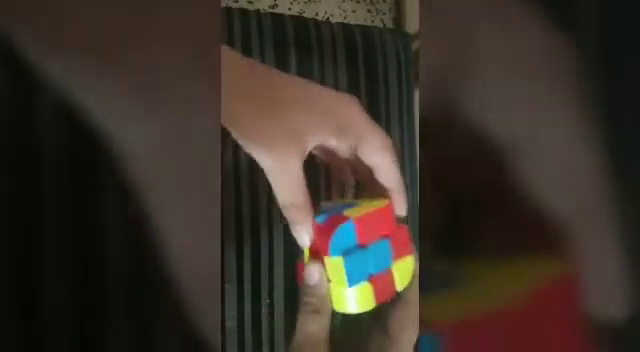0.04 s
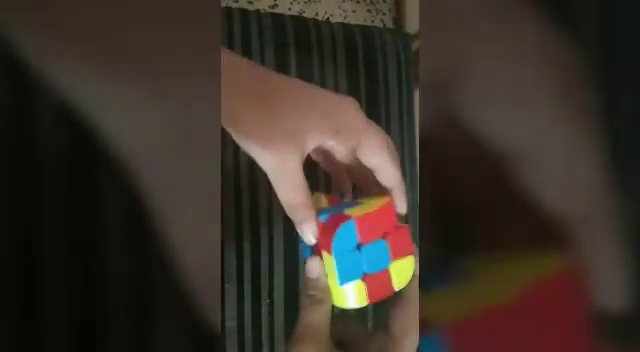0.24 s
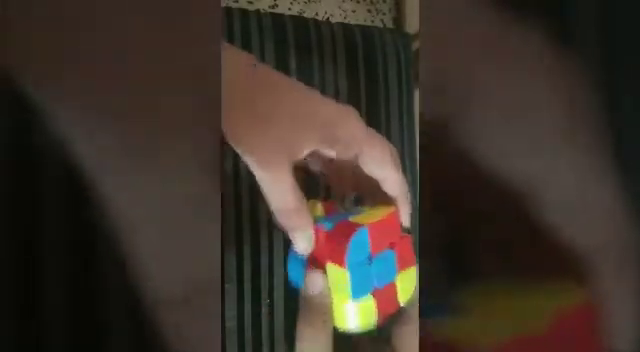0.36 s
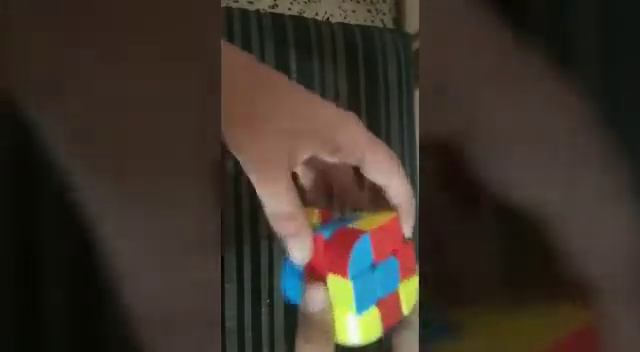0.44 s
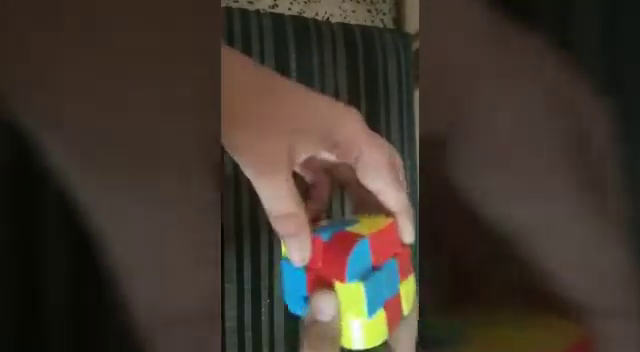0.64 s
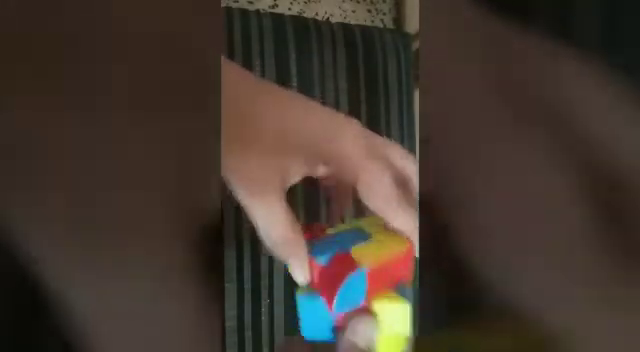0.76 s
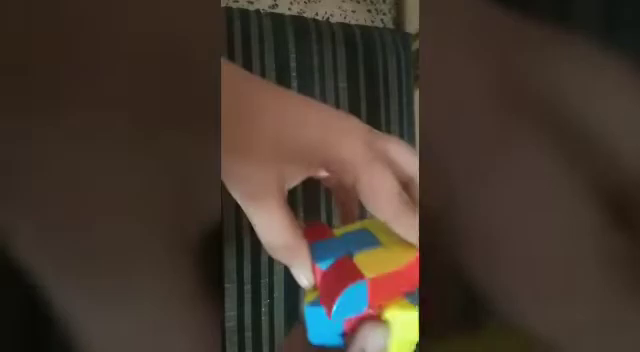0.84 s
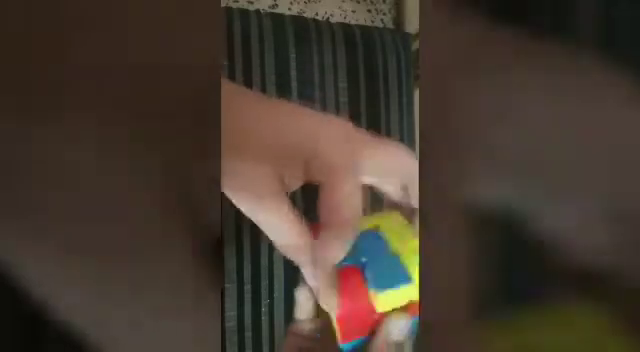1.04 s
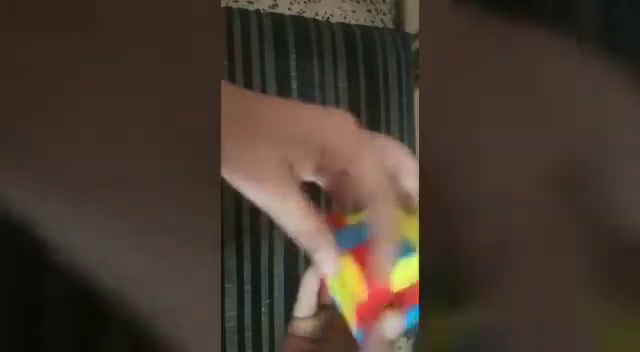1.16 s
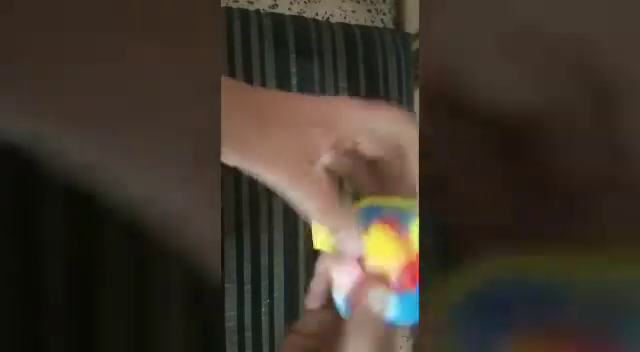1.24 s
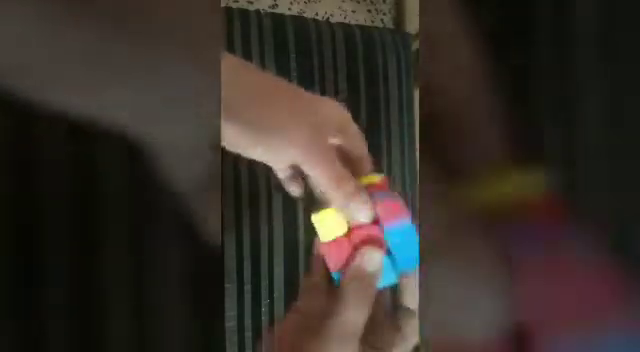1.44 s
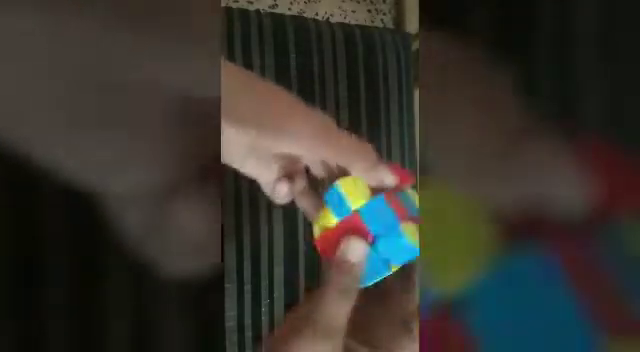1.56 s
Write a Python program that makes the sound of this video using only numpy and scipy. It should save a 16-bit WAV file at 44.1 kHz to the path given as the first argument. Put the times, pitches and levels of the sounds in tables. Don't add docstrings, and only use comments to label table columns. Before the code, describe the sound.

A plastic puzzle cube is twisted by hand, close to a phone microphone in a small soft room. Faint ticks lead to a loud, bright cluster of clacks at 0.2-0.28 s. Sparse light ticks and brief scrapes follow until 1.02 s. A second, slightly softer rattling snap peaks around 1.09 s. Lighter clicks and sliding scrapes run from 1.27 to 1.6 s, with a tiny chirp near 1.39 s. Faint hum underneath.

```python
import sys
import numpy as np
from scipy import signal
from scipy.fft import rfft, irfft, next_fast_len
from scipy.io import wavfile

SR = 44100
rng = np.random.default_rng(int(sys.argv[2]) if len(sys.argv) > 2 else 0)


def wav_record(signal):
    frames = np.transpose(np.atleast_2d(signal))
    bounded = np.clip(frames, -1, 1)
    quanta = np.round(bounded * 32767).astype(np.int16)
    wavfile.write(sys.argv[1], SR, quanta)


def level_to_linear(level):
    exponent = np.asarray(level, float) / 20
    return 10 ** exponent


N = 70560

# t/s, edge level/dB, shell over edge/dB, piece f/Hz
FIRST_TURN = [(0.0257, -35.5, -11, 1300), (0.0268, -46.5, -27, 2000), (0.0642, -45, -7, 3100),
              (0.0939, -42.5, -2, 2400), (0.112, -53, 6, 2000), (0.1233, -39, 4, 2250),
              (0.146, -44, -27, 2240), (0.158, -44, -20, 3450), (0.1725, -35, -37, 1030),
              (0.1893, -33, -14, 2150), (0.1954, -34, -5, 1380), (0.199, -28.5, -6, 1980),
              (0.201, -10.5, -17.5, 1680), (0.2021, -20.5, -7, 4440), (0.204, -18, -16, 3100),
              (0.206, -27, -4, 2200), (0.2151, -22, -14, 1790), (0.2210, -10, -23.5, 4200),
              (0.2215, -15, -2, 1640), (0.2235, -4.5, -13, 2740), (0.224, -15, -10, 3200),
              (0.2267, -30, -28, 4600), (0.235, -17, -24, 3760), (0.2486, -1.5, -18, 3100),
              (0.2500, -10.5, -11, 534), (0.2512, -22, -10, 1700), (0.2518, -13, -18, 4500),
              (0.256, -13, -15, 1580), (.2588, -13.5, -13, 3450), (0.2605, -13.5, -14, 4400),
              (.264, -20, -26, 2180), (0.277, -20.5, -16, 2720), (0.3571, -32.5, -11, 3100),
              (0.377, -39, -5.5, 1280)]
# t/s, edge level/dB, shell over edge/dB, piece f/Hz
REGRIP = [(0.4124, -38.5, -4, 840), (0.416, -32.5, -14.5, 3560), (0.4522, -42, -7.5, 2600),
          (0.4881, -65, -12, 4000), (0.4889, -26.5, -10, 2540), (0.491, -34.5, -8, 1300),
          (0.534, -35, -5, 1460), (0.54, -29, -12, 3050), (0.5698, -41, -15, 1460),
          (0.611, -34.5, -9.5, 940), (0.662, -34, -13.5, 1310), (0.6797, -39.5, 0.5, 3440),
          (0.6868, -33, -5, 3940), (0.689, -28, -12, 2400), (0.6902, -37, -3.5, 2000),
          (0.69, -38, -1, 3270), (0.708, -61.5, 14, 794), (0.7305, -37, -4.5, 3500),
          (0.732, -36, -13, 2450), (0.737, -39, -10, 1850), (0.7724, -39, -6.5, 3770),
          (0.777, -37.5, -13, 2000), (0.79, -36, -6.5, 4850), (0.7974, -35.5, -2.5, 2430),
          (0.8, -30, -24, 4330), (0.802, -34.5, -10.5, 1290), (0.8075, -27.5, -36, 2600),
          (0.8187, -42.5, -7.5, 2060), (0.8481, -41.5, -3.5, 1800), (0.8529, -41, -3.5, 1400),
          (0.901, -38.5, -7.5, 1800), (0.973, -34, -11, 2050), (0.988, -38, -9, 2480),
          (0.993, -39, -1.5, 1420), (1.0232, -32.5, -32, 4800), (1.0275, -36, -8, 2190)]
# t/s, edge level/dB, shell over edge/dB, piece f/Hz
SECOND_TURN = [(1.054, -35, -1.5, 900), (1.0577, -30.5, -10, 2000), (1.061, -33, -15, 2980),
               (1.0685, -28, -12, 1990), (1.073, -27, -4, 4640), (1.0764, -19, -13, 800),
               (1.0784, -17.5, -9, 800), (1.081, -18.5, -9, 815), (1.084, -15, -6, 2630),
               (1.085, -17.5, -8.5, 800), (1.087, -11, -15, 1360), (1.0882, -8.5, -29, 3050),
               (1.0904, -17.5, -16, 2000), (1.0935, -20.5, -8.5, 2470), (1.0968, -19, -9, 3400),
               (1.101, -20, -21, 4650), (1.1013, -15, -8, 3100), (1.1038, -11, -18.5, 2460),
               (1.1048, -17.5, -10, 4770), (1.1058, -16.5, -20, 3770), (1.1115, -31, -17, 3880),
               (1.118, -41, -14, 4600), (1.1807, -33, -12, 2030), (1.2145, -42.5, -3.5, 744)]
# t/s, edge level/dB, shell over edge/dB, piece f/Hz
LIGHT_TURNS = [(1.274, -36, -21, 3030), (1.2777, -33.5, 1, 1900), (1.279, -35.5, -5, 3600),
               (1.283, -33, -11, 4570), (1.293, -24, -7.5, 4640), (1.2951, -24, -22, 4800),
               (1.2987, -26.5, -17, 4400), (1.3033, -32, -3.5, 5000), (1.3055, -35, -3, 5000),
               (1.3103, -40, -15, 4300), (1.3301, -31.5, -26, 4800), (1.337, -45.5, 0, 2040),
               (1.3495, -41, 1.5, 2200), (1.356, -40, -7.5, 2300), (1.3826, -41, -14, 1940),
               (1.3862, -25, -19, 2200), (1.4159, -23.5, -4, 2230), (1.4211, -22.5, -15.5, 1700),
               (1.4349, -29, -12, 2290), (1.456, -30.5, -1, 4600), (1.4578, -36.5, -10, 2600),
               (1.478, -36.5, -2, 3450), (1.4822, -30, -21, 2500), (1.4992, -33.5, -16, 2140),
               (1.5263, -54, 1, 1300), (1.535, -48, -5, 2500), (1.541, -49.5, 4.5, 1380),
               (1.564, -39.5, 1, 2260), (1.571, -34.5, -8.5, 1320), (1.577, -30.5, -4.5, 5030),
               (1.5797, -34.5, -7, 3020), (1.589, -40, -12, 2540), (1.5934, -40, -22, 3780)]
# t/s, level/dB
SLIDE_PRESSURE = [(0, -93), (.17, -64), (.2, -36.5), (.35, -44.5), (.6, -88), (0.678, -39.5), (.76, -92),
                  (.81, -52.5), (.95, -51.5), (1.069, -45), (1.11, -58), (1.238, -49.5), (1.308, -38.5),
                  (1.382, -45), (1.43, -38.5), (1.489, -51), (1.52, -48), (1.579, -38.5)]
# t/s, level/dB
THUMPS = [
    (0.249, -48),
    (.29, -56),
    (0.699, -54.5),
    (0.734, -61.5),
    (0.416, -57.5),
    (1.076, -56.5),
    (1.291, -64),
]
# f/Hz, level/dB
EDGE_TONE = [(1800, -43), (3000, -25.5), (4700, -7), (6300, -1), (7600, 1), (9300, -18.5), (11000, -27.5),
             (15500, -56)]
# f/Hz, width/Hz, level/dB
SHELL_MODES = [(800, 433, -0.5), (1530, 890, 3), (2400, 2090, 1.5), (4196, 830, 2.5), (5000, 910, 3)]
# f/Hz, level/dB
AIR_TONE = [(15, -40), (30, -1.5), (102, 5), (451, 0), (2500, -13.5), (7600, -9), (9600, -34), (15700, -33)]
# f/Hz, t/s
ECHO_DECAY = [(500, 0.23), (2000, 0.19), (7000, 0.18), (10000, 0.24), (11800, 0.059)]

AIR_DB = -62.5
ROOM_DB, ROOM_GAP_S = -9.5, 0.004
CONTACT_LAG_S, CHATTER_S = 0.0007, 0.0035
RUB_S, RUB_DB = 0.0012, -11
REBOUND_LOSS_DB, REBOUND_SCATTER_DB = 30, 8
PUFF_LENGTHS, PUFF_DB = 4.2, -17
SOFT_PUFF_PER_DB = 0.2
SHELL_DB, SHELL_SCATTER_DB = 3, 1.5
SHELL_LOW_HZ, SHELL_TOP_HZ = 605, 7000
PIECE_DB, PIECE_Q = 5, 4
SPARK_HZ, SPARK_DB, SPARK_FROM_DB = 13500, -27, -14
SLIPS_PER_S, SLIP_SPREAD_DB, SLIDE_DB, SLIDE_SHELL_DB = 2500, 2, -7.5, -7.5
THUMP_HZ, THUMP_T60_S, THUMP_RISE_S = 110.5, 0.14, 0.0035
PUSH_DB, PUSH_S = 13, 0.00056
SQUEAK_S, SQUEAK_LONG_S, SQUEAK_DB = 1.3845, 0.013, -33
SQUEAK_HZ, SQUEAK_WIDTH_HZ = 6450, 220
TOP_HZ = 15800
MASK_HZ, MASK_DB, LOUD_DB, FILL_DB = 11000, -35, -47, -37


def unit(x):
    return x / np.sqrt(np.mean(x ** 2) + 1e-20)


def along(points, hz):
    f, value = np.transpose(points)
    return np.interp(np.log(hz + 1), np.log(f + 1), value)


def filtered(x, response):
    size = next_fast_len(x.shape[-1] + 8192)
    spectrum = rfft(x, size) * response(np.fft.rfftfreq(size, 1 / SR))
    return irfft(spectrum, size)[..., :x.shape[-1]]


def causal(points):
    def response(hz):
        c = irfft(np.log(np.maximum(level_to_linear(along(points, hz)), 1e-6)))
        c[1:len(c) // 2] *= 2
        c[len(c) // 2 + 1:] = 0
        return np.exp(rfft(c))
    return response


def ring(hz, width_hz):
    return lambda f: 1j * f * width_hz / (hz ** 2 - f * f + 1j * f * width_hz)


def shell(extra_db):
    def response(f):
        total = 0
        for k, (hz, width, db) in enumerate(SHELL_MODES):
            level = (-1) ** k * level_to_linear(db + extra_db[..., k, None])
            total = total + level * ring(hz, width)(f)
        low_cut = (1j * f / (SHELL_LOW_HZ + 1j * f)) ** 2
        return low_cut / (1 + 1j * f / SHELL_TOP_HZ) ** 4 * total
    return response


def peak(x):
    return x / np.abs(x).max(axis=1)[:, None]


def air():
    return level_to_linear(AIR_DB) * unit(filtered(rng.standard_normal(N), lambda hz: level_to_linear(along(AIR_TONE, hz))))


def contacts(edge_db, size, lead):
    count, hops = len(edge_db), 6
    jitter, loss, side = np.split(rng.random((count, 3 * hops)), 3, axis=1)
    t = (np.arange(size) - lead) / SR
    chatter_s = CHATTER_S * (0.55 + 0.87 * rng.random((count, 1)))
    rub = level_to_linear(RUB_DB) * np.exp(t.clip(None, 0) / RUB_S)
    puff = np.where(t < 0, rub, level_to_linear(-60 * t.clip(0) / (PUFF_LENGTHS * chatter_s)))
    puff_db = PUFF_DB - SOFT_PUFF_PER_DB * (edge_db + 7)
    force = level_to_linear(puff_db) * puff * rng.standard_normal((count, size))

    share = (np.arange(hops) + jitter - 0.5) * (np.arange(hops) > 0) / hops
    hit_db = -REBOUND_LOSS_DB * share - REBOUND_SCATTER_DB * loss * (share > 0)
    place = lead + np.round(share * chatter_s * SR).astype(int)
    np.add.at(force, (np.arange(count)[:, None], place), level_to_linear(hit_db) * np.sign(side - 0.5))
    return force


def snaps():
    rows = np.vstack([FIRST_TURN, REGRIP, SECOND_TURN, LIGHT_TURNS])
    start, edge_db, shell_db, piece_hz = np.split(rows, 4, axis=1)
    count, size, lead = len(rows), 2048, 256
    force = contacts(edge_db, size, lead)
    hollow = shell(SHELL_SCATTER_DB * rng.standard_normal((count, len(SHELL_MODES))))
    piece = ring(piece_hz, piece_hz / PIECE_Q)
    edge = filtered(force, causal(EDGE_TONE))
    body = filtered(force, lambda f: hollow(f) * (1 + level_to_linear(PIECE_DB) * piece(f)))

    sparking = (np.arange(count)[:, None] < len(FIRST_TURN)) & (edge_db > SPARK_FROM_DB)
    spark = peak(filtered(force, lambda f: ring(SPARK_HZ, SPARK_HZ / 2)(f) ** 2))
    bright = peak(edge) + level_to_linear(SPARK_DB) * sparking * spark
    sound = level_to_linear(edge_db) * (bright + level_to_linear(shell_db + SHELL_DB) * peak(body))
    where = np.round((start + CONTACT_LAG_S) * SR).astype(int) - lead + np.arange(size)
    return np.bincount(where.ravel(), sound.ravel(), N + size)[:N]


def room(x):
    count = 8
    hz, t, z = signal.stft(rng.standard_normal((count, SR // 2)), SR, nperseg=256)
    decay = level_to_linear(-60 * t / along(ECHO_DECAY, hz)[:, None])
    tails = signal.istft(z * decay, SR, nperseg=256)[1]
    tails = tails / np.linalg.norm(tails, axis=1, keepdims=True)
    turn = np.arange(N) * 5 * count // N % count
    parts = x * (turn == np.arange(count)[:, None])
    wet = signal.fftconvolve(parts, tails, axes=1).sum(0)
    return np.pad(wet, (round(ROOM_GAP_S * SR), 0))[:N]


def slide():
    t, db = np.transpose(SLIDE_PRESSURE)
    chance, strength, side = rng.random((3, N))
    size = level_to_linear(-SLIP_SPREAD_DB * np.log(strength + 0.0044))
    slips = (chance < SLIPS_PER_S / SR) * size * np.sign(side - 0.5)
    edge = unit(filtered(slips, causal(EDGE_TONE)))
    body = unit(filtered(slips, shell(np.zeros(len(SHELL_MODES)))))
    pressure = level_to_linear(np.interp(np.arange(N) / SR, t, db) + SLIDE_DB)
    return pressure * (edge + level_to_linear(SLIDE_SHELL_DB) * body)


def hands():
    start, db = np.split(np.array(THUMPS), 2, axis=1)
    since = (np.arange(N) / SR - start).clip(0)
    rise = 1 - np.exp(-since / THUMP_RISE_S)
    swell = (level_to_linear(db - 60 * since / THUMP_T60_S) * rise).sum(0)
    u = since / PUSH_S
    push = (level_to_linear(db + PUSH_DB) * u * (2 - u) * np.exp(-u)).sum(0)
    low = ring(THUMP_HZ, 0.45 * THUMP_HZ)
    rumble = filtered(rng.standard_normal(N), lambda f: (low(f) / 0.45) ** 2)
    return push + swell * unit(rumble)


def squeak():
    u = ((np.arange(N) / SR - SQUEAK_S) / SQUEAK_LONG_S).clip(0, 1)
    whistle = ring(SQUEAK_HZ, SQUEAK_WIDTH_HZ)
    chirp = np.sin(np.pi * u) * filtered(rng.standard_normal(N), lambda f: whistle(f) ** 2)
    return level_to_linear(SQUEAK_DB) * chirp / np.abs(chirp).max()


def masked(x):
    hz, _, (z, noise) = signal.stft([x, rng.standard_normal(x.shape)], SR, nperseg=768)
    top = ((hz > MASK_HZ) & (hz < TOP_HZ))[:, None]
    whole = (np.abs(z) ** 2).sum(1, keepdims=True)
    high = (np.abs(z * top) ** 2).sum(1, keepdims=True)
    quiet = whole < level_to_linear(2 * LOUD_DB)
    hiss = unit(np.abs(noise)) * np.exp(1j * np.angle(noise))
    fill = quiet * top * level_to_linear(FILL_DB) * np.sqrt(whole / top.sum()) * hiss
    kept = quiet | (high > level_to_linear(2 * MASK_DB) * whole) | ~top
    return signal.istft(z * kept + fill, SR, nperseg=768)[1][:, :N]


def scene():
    cube = snaps() + slide() + squeak()
    return (cube + level_to_linear(ROOM_DB) * room(cube) + hands() + air())[None]


def top_cut(x):
    return signal.sosfilt(signal.butter(12, 16320, fs=SR, output="sos"), x)


def record(dry):
    mix = masked(filtered(dry, lambda hz: hz < TOP_HZ))
    return top_cut(mix)


dry = scene()
out = record(dry)
wav_record(out)
```